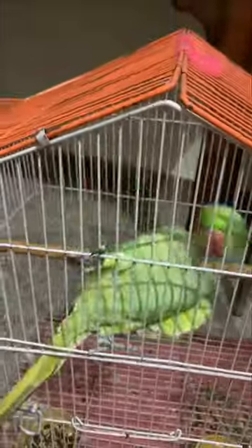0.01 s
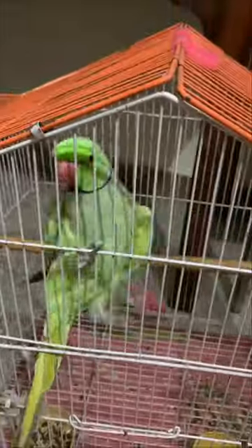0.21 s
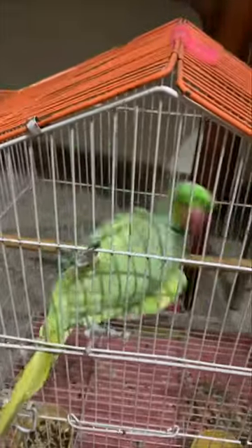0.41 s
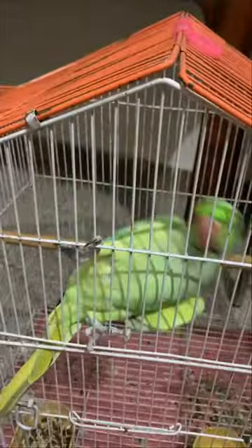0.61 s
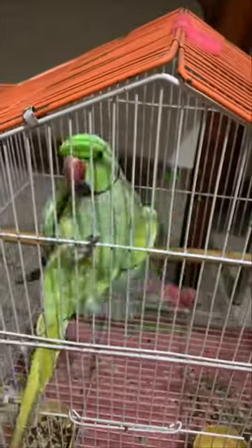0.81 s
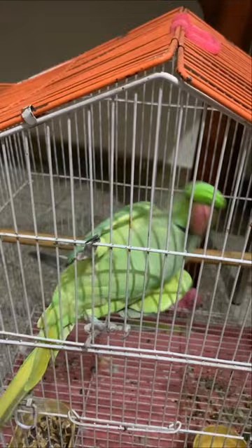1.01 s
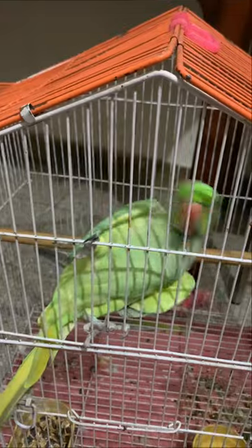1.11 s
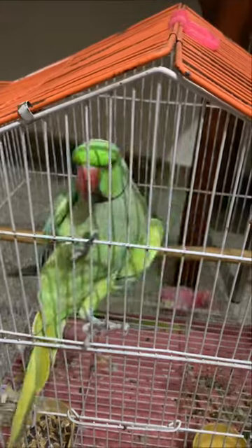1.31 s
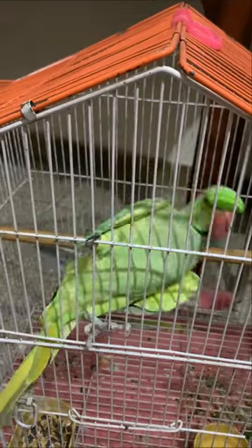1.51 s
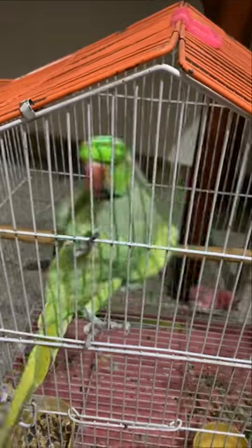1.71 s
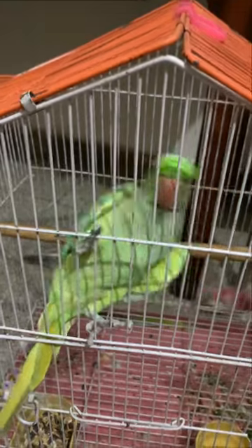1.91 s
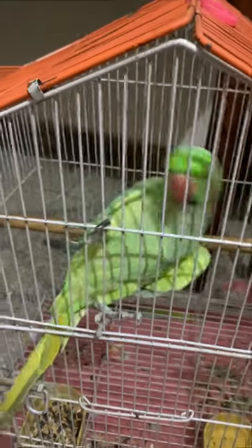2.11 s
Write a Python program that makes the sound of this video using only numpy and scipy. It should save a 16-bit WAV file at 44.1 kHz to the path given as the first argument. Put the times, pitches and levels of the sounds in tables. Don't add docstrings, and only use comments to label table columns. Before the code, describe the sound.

A parakeet close to the microphone gives three loud arched squawky chirps, each led by a quick tongue click; before and between, a second bird whistles faintly further off to the left, over low room hum.

```python
import sys
import numpy as np
from scipy import signal
from scipy.fft import rfft, irfft, next_fast_len
from scipy.io import wavfile
from scipy.ndimage import uniform_filter1d, map_coordinates

SR = 44100
rng = np.random.default_rng(int(sys.argv[2]) if len(sys.argv) > 2 else 0)


def convert_level_to_amplitude(level_db):
    exponent = np.asarray(level_db, float) / 20
    return 10 ** exponent


def generate_wav(signal):
    frames = np.transpose(np.atleast_2d(signal))
    scaled = np.clip(frames, -1, 1) * 32767
    pcm = np.round(scaled).astype(np.int16)
    wavfile.write(sys.argv[1], SR, pcm)


N = 94815

# freq_hz, level_db
HUM_SPECTRUM = [(20, -60), (60, -2), (110, -9.5), (340, 3), (480, -12), (1000, -15), (2400, -25),
                (4500, -42)]
# freq_hz, level_db
AIR_SPECTRUM = [(4000, -39), (6000, -23.5), (8000, -9.5), (10500, -45), (11500, -60), (16000, -75)]
# time_s, pitch_hz, level_db
WHISTLE_TRACKS = [
    [(0.128, 2168, -38), (0.142, 2232, -41), (0.152, 2830, -44.5), (0.174, 3156, -49), (0.196, 3152, -47),
     (0.22, 2888, -28), (0.245, 2336, -44)],
    [(0.327, 2835, -19.5), (0.335, 2875, -29), (0.361, 2981, -29), (0.395, 2897, -32), (0.425, 2285, -42.5)],
    [(0.496, 2765, -43), (0.506, 2844, -29.5), (0.54, 3104, -36.5), (0.562, 3071, -42), (0.572, 3053, -24),
     (0.582, 2859, -33), (0.612, 2292, -41.5)],
    [(0.647, 2692, -35), (0.657, 2799, -28.5), (0.663, 2923, -36.5), (0.691, 3063, -40),
     (0.703, 3024, -28.5), (0.729, 3038, -36), (0.745, 2921, -22)],
    [(1.062, 2738, -43), (1.102, 2991, -26), (1.116, 2994, -48), (1.124, 3019, -37), (1.14, 3024, -28.5),
     (1.158, 3100, -20), (1.19, 2931, -29)],
]
# freq_hz, level_db
WHISTLE_HISS = [(2500, -29.5), (4500, 6), (7000, -7.5), (9000, 0.5), (11000, -24), (12000, -60)]
# start_s, level_db of the first pulse, loss_per_pulse_db (negative: pulses grow)
CLICK_EVENTS = [
    (0.6587, -13, -5),
    (1.1223, 0.5, -1.5),
    (1.6052, -6.5, -1.5),
]
# time_s, pitch_hz, level_db
CALL_TRACKS = [
    [(0.7, 1249, -15), (0.71, 1193, -25), (0.732, 1194, -23.5), (0.758, 1513, -21.5), (0.798, 1652, -19),
     (0.858, 1769, -20), (0.938, 1651, -20), (0.958, 1425, -32), (0.968, 1282, -33)],
    [(1.154, 1215, -17.5), (1.162, 1172, -13), (1.19, 1553, -21), (1.218, 1641, -18.5), (1.252, 1750, -21),
     (1.308, 1829, -22.5), (1.388, 1765, -22.5), (1.404, 1604, -29), (1.414, 1340, -35.5)],
    [(1.643, 1438, -11), (1.651, 1219, -26.5), (1.661, 1375, -14.5), (1.677, 1585, -17.5),
     (1.703, 1653, -11), (1.785, 1830, -20), (1.865, 1680, -17.5), (1.881, 1561, -32), (1.892, 1316, -26.5)],
]
# centre_hz, width_hz, level_db
THROAT_PEAKS = [(1243, 350, -13), (3259, 682, 2.5), (4468, 240, 4.5), (5454, 170, -6.5), (6450, 500, -4.5),
                (8210, 1700, -8), (9346, 1800, -6.5), (13500, 3200, -15)]
# freq_hz, t60_s
ROOM_T60 = [(1000, 0.43), (2400, 0.34), (3400, 0.44), (4500, .25), (5500, 0.19), (7000, 0.35),
            (12000, 0.13)]
# freq_hz, likeness_0_to_1
PORT_LIKENESS = [(60, 0.97), (300, 1), (700, 0.2), (2000, 0.99), (3200, 0.067), (4500, 0.35), (16000, 1)]
# freq_hz, left_over_right_db
FAR_BALANCE = [(2200, 17), (2700, 8), (3100, 6.5), (4500, 1.5)]
# freq_hz, level_db
MIC_RESPONSE = [(400, 1), (10600, 2), (11400, -14.5), (13000, -11.5), (15500, -20), (16200, -63)]
# freq_hz, left_over_right_db
PORT_BALANCE = [(60, 0), (700, -5), (1500, -0.5), (3100, -11), (3600, 5.5), (5300, -4.5), (6000, 0.5),
                (16000, -0.5)]
# freq_hz, left_lead_rad
PORT_LEAD = [(100, 0), (1900, .1), (2500, 2), (4000, 2), (5000, 3.1), (8300, 6.3), (12000, 9.4),
             (16000, 12.8)]
# time_s, gain_db
GAIN_TRACK = [(0, -1.5), (.66, 0), (.7, 0.5), (0.718, -7.5), (0.778, -16), (1.0, -18.5), (1.131, -12),
              (1.178, -15), (1.4, -22.5), (1.601, -14.5), (1.7, -22), (1.899, -20.5), (2.15, -20.5)]

HUM_DB, AIR_DB, SWELL_DB, SWELL_RATE_HZ = -40.5, -66.5, -0.5, 14
WHISTLE_DB, WHISTLE_EDGE_S, OCTAVE_DB, WHISTLE_HISS_DB = 3.5, .008, -60, -57
FLICK_S, FLICK_DB, FLICKS_UNTIL_S = .02, -46, .6
FLICK_START, FLICK_SPAN = .86, .44
CLICK_PULSES, CLICK_GAP_S, CLICK_DB = 4, .00175, 10.5
PUFF_SAMPLES, PUFF_GAIN, PUFF_DB = 350, 0.17, 11.5
CALL_DB, ATTACK_S, RELEASE_S, FLUTTER_DB = 17, .008, .003, 2.5
JITTER, RASP_JITTER = .0005, .016
BREATH, RASP, RASP_S = .002, .4, .008
GLIDE_RASP_HZ_PER_S = 25000
PITCH_SMOOTH_SAMPLES = 450
FAR_LEAD_S, FAR_WET_DB, FAR_WALL_DB, FAR_WALL_S = -0.000049, -9, -5.5, 0.01
NEAR_WET_DB, NEAR_WALL_DB, NEAR_WALL_S = -18, -10, 0.015
CEILING = .92
HALF_EACH = np.array([[.5], [-.5]])


def unit(x):
    return x / np.sqrt(np.mean(x ** 2) + 1e-20)


def along(points, hz):
    f, v = np.transpose(points)
    return np.interp(np.log(hz + 1), np.log(f + 1), v)


def wobble(rate_hz, size):
    knots = rng.standard_normal(int(size * rate_hz / SR) + 4)
    return map_coordinates(knots, [np.arange(size) * rate_hz / SR])


def filtered(x, response):
    m = next_fast_len(N + SR // 2)
    return irfft(rfft(x, m) * response(np.fft.rfftfreq(m, 1 / SR)), m)[..., :N]


def coloured(size, spectrum):
    return unit(filtered(rng.standard_normal(size), lambda f: convert_level_to_amplitude(along(spectrum, f))))


def resonances(peaks):
    def response(f):
        total = 0
        for k, (c, w, db) in enumerate(peaks):
            total = total + (-1) ** k * convert_level_to_amplitude(db) * 1j * f * w / (c * c - f * f + 1j * f * w)
        return total
    return response


def fade(t, length_s, rise_s, fall_s):
    ramp = np.minimum(t / rise_s, (length_s - t) / fall_s)
    return np.sin(np.pi / 2 * np.clip(ramp, 0, 1)) ** 2


def spread(pair):
    def mid_side(hz):
        turn = np.arccos(np.clip(along(PORT_LIKENESS, hz), -1, 1)) / 2
        return np.array([np.cos(turn), np.sin(turn)])
    mid, side = filtered(pair, mid_side)
    return np.array([mid + side, mid - side])


def floor():
    hum = coloured((2, N), HUM_SPECTRUM)
    air = coloured((2, N), AIR_SPECTRUM)
    return spread(convert_level_to_amplitude(HUM_DB + SWELL_DB * wobble(SWELL_RATE_HZ, N)) * hum + convert_level_to_amplitude(AIR_DB) * air)


def flick(first_hz):
    t = np.arange(round(FLICK_S * SR)) / SR
    hz = first_hz * (FLICK_START + FLICK_SPAN * t / FLICK_S)
    return convert_level_to_amplitude(FLICK_DB) * fade(t, FLICK_S, 0.0047, 0.001) * np.sin(2 * np.pi * np.cumsum(hz) / SR)


def whistles():
    out = np.zeros(N)
    hiss = coloured(N, WHISTLE_HISS)
    for track in WHISTLE_TRACKS:
        times, *cols = np.transpose(track)
        start_s, length_s = times[0], times[-1] - times[0]
        t = np.arange(round(length_s * SR)) / SR
        hz, db = [uniform_filter1d(np.interp(t + start_s, times, c), size=250, mode="nearest") for c in cols]
        phase = 2 * np.pi * np.cumsum(hz) / SR
        tone = convert_level_to_amplitude(db + WHISTLE_DB) * np.sin(phase) + convert_level_to_amplitude(OCTAVE_DB) * np.sin(2 * phase)
        at = round(start_s * SR)
        span = slice(at, at + len(t))
        out[span] += fade(t, length_s, WHISTLE_EDGE_S, WHISTLE_EDGE_S) * tone
        out[span] += convert_level_to_amplitude(WHISTLE_HISS_DB) * fade(t, length_s, 0.022, 0.014) * hiss[span]
        if start_s < FLICKS_UNTIL_S:
            lead_in = flick(hz[0])
            out[at - len(lead_in):at] += lead_in
    return out


def clicks():
    out = np.zeros(N)
    pulse = np.arange(CLICK_PULSES)
    t = np.arange(PUFF_SAMPLES) / SR
    for start_s, db, loss_db in CLICK_EVENTS:
        at = np.round((start_s + CLICK_GAP_S * pulse) * SR).astype(int)
        puff = fade(t, t[-1], 0.00057, .003) * rng.standard_normal(PUFF_SAMPLES)
        out[at[0]:at[0] + PUFF_SAMPLES] += PUFF_GAIN * convert_level_to_amplitude(db - loss_db + PUFF_DB) * puff
        out[at] += convert_level_to_amplitude(db + CLICK_DB - loss_db * pulse)
    mouth = [(1500, 2600, -8)]
    return filtered(out, lambda f: resonances(THROAT_PEAKS)(f) + resonances(mouth)(f))


def calls():
    out = np.zeros(N)
    throat = resonances(THROAT_PEAKS)
    breath = unit(filtered(rng.standard_normal(N), lambda f: throat(f) * f ** 4 / (f ** 4 + 2200 ** 4)))
    k = np.arange(1, 14)[:, None]
    for track in CALL_TRACKS:
        times, *cols = np.transpose(track)
        t = np.arange(round((times[-1] - times[0]) * SR)) / SR
        hz, db = [np.interp(t + times[0], times, c) for c in cols]
        hz = uniform_filter1d(hz, size=PITCH_SMOOTH_SAMPLES, mode="nearest")
        glide = np.gradient(hz) * SR / GLIDE_RASP_HZ_PER_S
        hoarse = np.exp(-t / RASP_S) + np.clip(glide, 0, 1) ** 2
        hz = hz * (1 + (JITTER + RASP_JITTER * hoarse) * wobble(400, len(t)))
        phase = 2 * np.pi * np.cumsum(hz) / SR
        flutter = convert_level_to_amplitude(FLUTTER_DB * np.array([wobble(50.3, len(t)) for _ in k]))
        shape = throat(k * hz) * flutter * (k * hz < 16000)
        tone = (shape * np.exp(1j * k * phase)).real.sum(0)
        tone = tone / np.sqrt((abs(shape) ** 2).sum(0) / 2)
        at = round(times[0] * SR)
        span = slice(at, at + len(t))
        noise = breath[span] * (1 + np.cos(phase))
        voice = tone + (BREATH + RASP * hoarse) * noise
        out[span] = convert_level_to_amplitude(db + CALL_DB) * fade(t, t[-1], ATTACK_S, RELEASE_S) * voice
    return out


def room(x, wall_db, wall_s, wet_db):
    size = SR // 2
    lag = np.arange(size) / SR
    walls = rng.normal(0, 1, (2, size)) * (rng.random((2, size)) < .03)
    walls = walls * np.exp(-lag / wall_s) * (lag > .0006)
    hz, t, z = signal.stft(rng.standard_normal((2, size)), SR, nperseg=256)
    decay = convert_level_to_amplitude(-60 * t / along(ROOM_T60, hz)[:, None])
    tail = signal.istft(z * decay, SR, nperseg=256)[1][:, :size]
    answer = convert_level_to_amplitude(wall_db) * walls / np.linalg.norm(walls[0])
    answer = answer + convert_level_to_amplitude(wet_db) * tail / np.linalg.norm(tail[0])
    return x + spread(signal.fftconvolve(x[None], answer, axes=1)[:, :N])


def far_side(x):
    def ports(f):
        difference = 2j * np.pi * f * FAR_LEAD_S + np.log(convert_level_to_amplitude(along(FAR_BALANCE, f)))
        return np.exp(HALF_EACH * difference)
    return filtered(x, ports)


def scene():
    far = far_side(room(whistles(), FAR_WALL_DB, FAR_WALL_S, FAR_WET_DB))
    near = room(clicks() + calls(), NEAR_WALL_DB, NEAR_WALL_S, NEAR_WET_DB)
    return floor() + far + near


def top_cut(x):
    return signal.sosfilt(signal.butter(12, 16010, fs=SR, output="sos"), x)


def record(dry):
    def ports(f):
        level_db = along(MIC_RESPONSE, f) + HALF_EACH * along(PORT_BALANCE, f)
        return convert_level_to_amplitude(level_db) * np.exp(1j * HALF_EACH * along(PORT_LEAD, f))
    x = filtered(dry, ports)
    x = x * convert_level_to_amplitude(np.interp(np.arange(N) / SR, *np.transpose(GAIN_TRACK)))
    x = x / (1 + abs(x / CEILING) ** 10) ** (1 / 10)
    return top_cut(x)


dry = scene()
out = record(dry)
generate_wav(out)
```